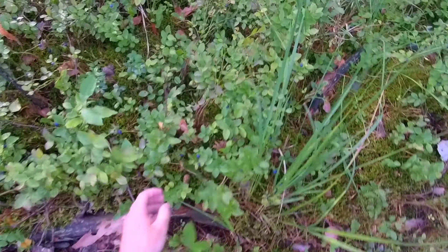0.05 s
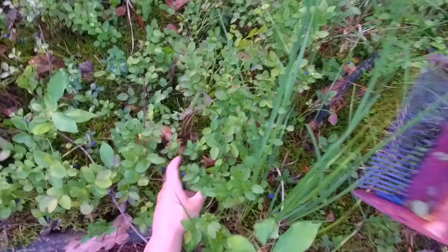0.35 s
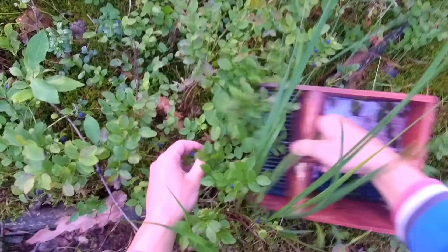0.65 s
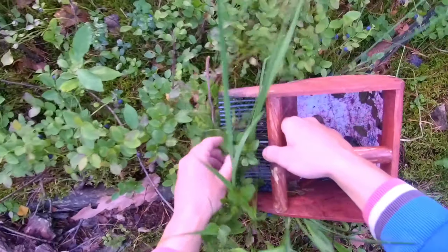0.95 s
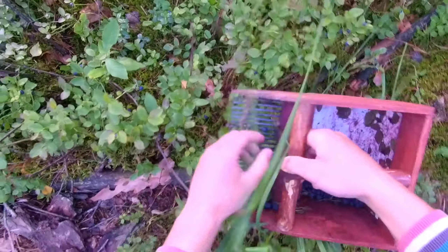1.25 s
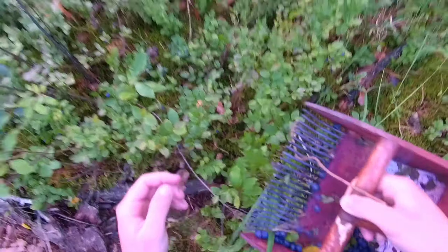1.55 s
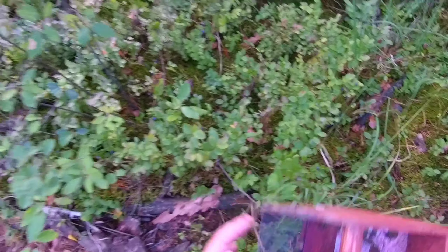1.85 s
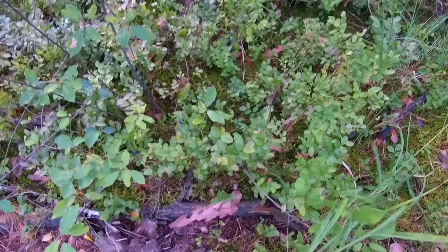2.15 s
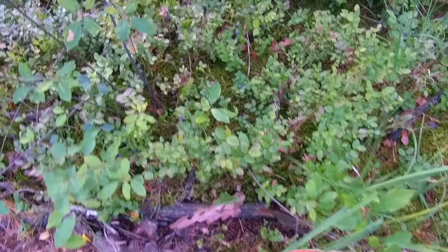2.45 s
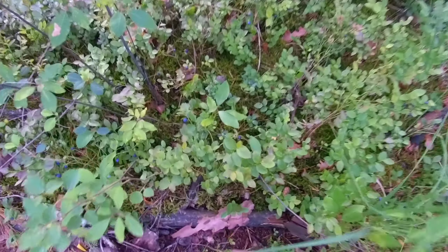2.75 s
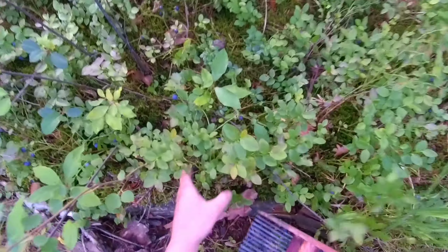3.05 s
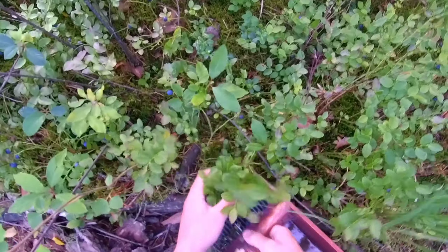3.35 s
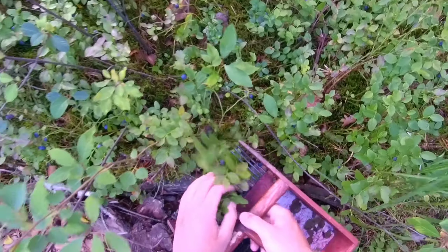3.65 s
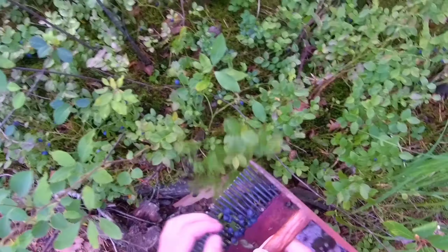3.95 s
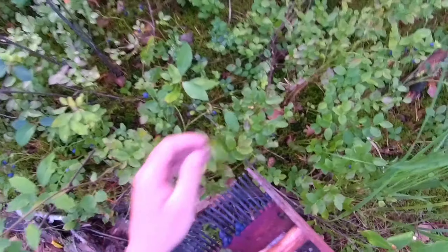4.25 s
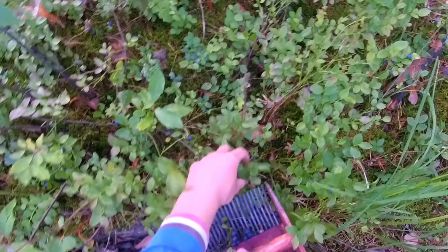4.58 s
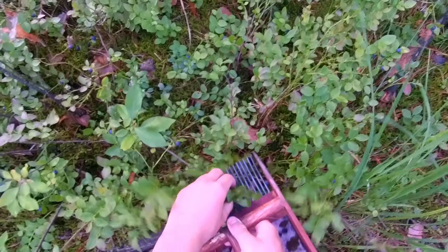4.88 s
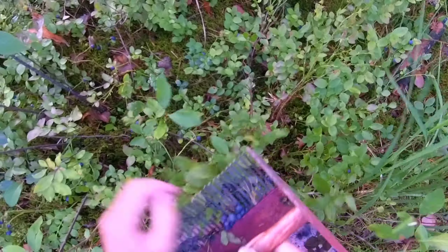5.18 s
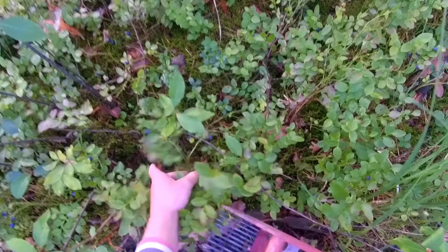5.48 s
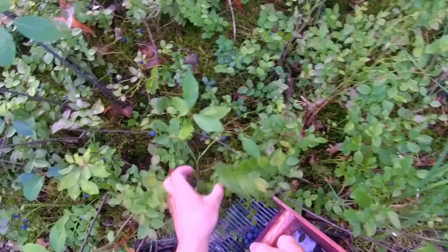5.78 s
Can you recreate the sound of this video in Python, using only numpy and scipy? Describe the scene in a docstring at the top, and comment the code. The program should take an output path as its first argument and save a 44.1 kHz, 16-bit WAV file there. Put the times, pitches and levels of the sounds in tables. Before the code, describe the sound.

A hand-held berry comb rakes through low bushes, close, dry and mostly on the left, over the faint air of an almost silent forest. From about 0.5 to 2 seconds, leaves crackle, stems scrape between the tines and stalks snap. The box knocks lightly, bumps the ground, and berries drop and roll inside it. From 2 to 3 seconds there is a lull with only faint twig scuffs. The raking then picks up, with sharp snaps and small pings of the tines just before 4 seconds. The hardest hollow knock of the box lands at about 4 seconds, followed by a quick cluster of knocks and plops between 4.2 and 4.6. Another rustling stroke passes around 5 seconds, and one more hard knock comes at 5.4. Berries roll and plop softly under the last light strokes until about 6 seconds.

```python
"""A berry comb rakes through low bushes, close on the left, in an almost silent forest.
In the first strokes leaves crackle, stems scrape between the tines and stalks snap, while the box
knocks and berries drop and roll in its hopper. From 2 to 3 s there is a lull of faint twig scuffs.
Then the raking picks up, with the hardest hollow knock near 4 s and a quick cluster after it.
One more hard knock comes at 5.4 s, and berries roll and plop under the last light strokes."""
import sys
import numpy as np
from scipy import signal
from scipy.io import wavfile
from scipy.ndimage import map_coordinates

SR = 44100
rng = np.random.default_rng(int(sys.argv[2]) if len(sys.argv) > 2 else 0)


def master(y):
    """Save y as 16-bit WAV."""
    cut = np.clip(np.atleast_2d(y).T, -1, 1)
    pcm = np.round(cut * 32767)  # scale
    wavfile.write(sys.argv[1], SR, pcm.astype(np.int16))


N = 265482
TIME = np.arange(N) / SR
RING = np.arange(round(.15 * SR)) / SR  # time axis of a one-shot [s]
HOLLOW_HZ = 510.5  # the note of the air in the hopper

# modes of the comb's tines: (frequency [Hz], level [dB], t60 [s])
TINE_MODES = [(1219, 9, 0.024), (1580, 0.5, 0.032), (1871, 13.5, 0.026), (2314, 0, 0.065),
              (2935, -7, 0.049)]
# woody spectrum of the stems: (frequency [Hz], level [dB])
STEM_SPECTRUM = [(100, -23.5), (250, -14.5), (600, 0.5), (900, -5.5), (1250, -6), (1900, -2.5), (2800, 0),
                 (3500, -7.5), (6000, -14), (12000, -45)]
# bright spectrum of a breaking stalk or leaf: (frequency [Hz], level [dB])
CRACK_SPECTRUM = [(500, -15), (2500, -12), (5000, 7), (8000, 11), (9800, 12.5), (12500, 4), (16000, 3.5)]


def amp(db):
    """Decibels to gain."""
    return 10 ** (np.asarray(db) / 20)


def unit_rms(x):
    """Scales to rms 1."""
    return x / np.sqrt(np.mean(x ** 2) + 1e-20)


def add(mix, start, sound):
    """Mixes in a stereo sound at start [s]."""
    part = mix[:, max(round(start * SR), 0):][:, :sound.shape[1]]
    part += sound[:, :part.shape[1]]


def pan(left_db):
    """Left and right gains of unit power."""
    gains = np.array([[amp(left_db)], [1]])
    return gains / np.linalg.norm(gains)


def through_box(x, right_db, lag_rad):
    """Sound carried by the box reaches the right side at another level and later in phase."""
    late = (signal.hilbert(x, 2 * len(x))[:len(x)] * np.exp(-1j * lag_rad)).real
    return np.array([x, amp(right_db) * late])


def colour(x, spectrum, size=2048):
    """Minimum-phase EQ of unit energy with the given spectrum."""
    hz, db = np.transpose(spectrum)
    bin_hz = abs(np.fft.fftfreq(size, 1 / SR)) + 1
    log_gain = np.log(amp(np.interp(np.log(bin_hz), np.log(hz), db)))
    taps = np.fft.ifft(np.exp(np.conj(signal.hilbert(log_gain)))).real[:size // 2]
    return signal.oaconvolve(x, taps / np.linalg.norm(taps))[:len(x)]


def mottle(x, depth_db, patch_s, patch_width, size=512):
    """Random brief patches of louder and softer bands make the colour flicker."""
    frames = dict(fs=SR, nperseg=size, noverlap=size * 3 // 4)
    hz, t, spectra = signal.stft(x, **frames)
    grid = np.meshgrid(np.sqrt(hz * 2000) / patch_width, t / patch_s, indexing="ij")
    patches = map_coordinates(rng.standard_normal((size // 4, size)), grid, order=2, mode="mirror")
    spectra = spectra * amp(depth_db * unit_rms(patches))
    return unit_rms(signal.istft(spectra, **frames)[1][:N])


def wander(per_s):
    """Random drift of rms 1."""
    return unit_rms(np.interp(TIME * per_s, np.arange(N), rng.standard_normal(N)))


def grains(per_s, spread_db):
    """Random clicks; a positive spread makes a few stand out, a negative one sinks a few."""
    size = amp(spread_db * np.minimum(rng.exponential(1, N), 5))
    return unit_rms(size * rng.choice([-1, 1], N) * (rng.random(N) < per_s / SR))


def burst(peak_s):
    """Transient envelope that reaches 1 at peak_s and dies away."""
    return RING / peak_s * np.exp(1 - RING / peak_s)


def ring(modes, rise_s, detune=0.0023):
    """A struck object; each blow wakes its modes a little differently."""
    out = 0
    for hz, db, t60 in modes:
        decay = amp(db + 2 * rng.standard_normal() - 60 * RING / t60)
        pitch = hz * (1 + detune * rng.standard_normal())
        out += decay * np.sin(2 * np.pi * (pitch * RING + rng.random()))
    out *= 1 - np.exp(-(RING / rise_s) ** 2)
    return out / abs(out).max()


def cavity(hz, rise_s, t60, tail_db, tail_t60):
    """Air in a box swells, dies fast and leaves a weaker after-ring."""
    attack = (1 - np.exp(-RING / rise_s)) ** 2
    shape = attack * (amp(-60 * RING / t60) + amp(tail_db - 60 * RING / tail_t60))
    return shape / shape.max() * np.sin(2 * np.pi * hz * RING)


def small_box(x, low_cut_hz=288):
    """The small box radiates little bass and dips on both sides of its hollow note."""
    # notches: (frequency [Hz], Q [ratio])
    dips = [(355, 2.97), (725, 19)]
    notches = [np.concatenate(signal.iirnotch(hz, q, fs=SR)) for hz, q in dips]
    low_cut = signal.butter(2, low_cut_hz, "highpass", fs=SR, output="sos")
    return signal.sosfilt(np.vstack([notches, low_cut]), x)


def forest(level_db=-69):
    """A faint, even bed of air."""
    # forest air: (frequency [Hz], level [dB])
    spectrum = [(20, 22), (100, 12.5), (250, 8), (800, 5), (2000, -2.5), (5000, 0), (15000, -10)]
    return amp(level_db) * np.array([colour(rng.standard_normal(N), spectrum) for _ in range(2)])


def twig_scuffs():
    """A twig sliding past the comb sticks and slips for a moment around its own pitch."""
    # sliding twigs: (time [s], level [dB], centre [Hz], length [s])
    scuffs = [(0.315, -53.5, 1015, 0.015), (1.724, -54, 2040, 0.03), (1.921, -55, 1520, 0.06),
              (2.172, -67.5, 1373, 0.066), (2.173, -64.5, 3170, 0.062), (2.242, -65, 3220, 0.055),
              (2.372, -55.5, 1238, 0.027), (2.375, -58, 2440, 0.035), (2.411, -52.5, 1530, 0.019),
              (2.504, -55, 1330, 0.014), (2.586, -52, 2710, 0.01), (2.83, -56.5, 2700, 0.072),
              (2.877, -50.5, 2700, 0.011), (3.068, -43.5, 2420, 0.012), (3.147, -47.5, 2750, 0.017),
              (4.917, -47.5, 2280, 0.014), (5.168, -52.5, 1260, 0.029)]
    # spectrum of a scuff: (frequency [multiple of the centre], level [dB])
    shape = [(.25, -21.5), (0.699, -6), (1, 4), (1.3, -12.5), (2.2, -22.5), (6.002, -40)]
    out = np.zeros((2, N))
    for start, db, hz, length in scuffs:
        u = RING / length
        slips = rng.standard_normal(len(RING)) * amp(9.56 * rng.standard_normal(len(RING)))
        swell = 4 * u * np.exp(-3 * u ** 2)
        scuff = colour(slips * swell, [(hz * ratio, level) for ratio, level in shape])
        add(out, start, through_box(amp(db) * scuff, right_db=-32, lag_rad=0.94))
    return out


def twig_ticks(stem_gain, level_db=-11.5, t60=0.037):
    """Small twigs flick off the tines at random, each with a brief pitch of its own."""
    out = np.zeros(N)
    for hz in np.geomspace(1400, 7000, 12):
        flicks = grains(per_s=3, spread_db=-5)
        out += signal.oaconvolve(flicks, ring([(hz, 0, t60)], rise_s=0.0013, detune=0.074))[:N]
    return amp(level_db) * unit_rms(out) * stem_gain


def tine_pings(rise_s=0.0016, t60=0.17):
    """A single tine, plucked by a stalk, rings on alone."""
    # plucks: (time [s], level [dB], pitch [Hz])
    plucks = [(1.925, -36.5, 1920), (2.061, -48.5, 1900), (3.763, -32.5, 1586), (3.866, -33.5, 1580),
              (3.868, -36, 1810), (5.181, -39.5, 1958)]
    out = np.zeros((2, N))
    shape = (1 - np.exp(-RING / rise_s)) * amp(-60 * RING / t60) * signal.windows.tukey(len(RING), .04)
    for start, db, hz in plucks:
        ping = amp(db) * shape * np.sin(2 * np.pi * hz * RING)
        add(out, start, through_box(ping, right_db=-46, lag_rad=1.5))
    return out


def ground_bumps():
    """The comb bumps the ground with a short, dull note."""
    # bumps: (time [s], peak [dB], pitch [Hz], left over right [dB])
    bumps = [(0.7592, -31, 880, -4.5), (0.76, -33, 337, 3), (0.76, -35.5, 201, -2),
             (0.765, -34.5, 116, -0.5), (3.473, -32, 265, 3.5), (3.767, -32.5, 291.6, 9)]
    out = np.zeros((2, N))
    for start, db, hz, left_db in bumps:
        thud = cavity(hz, rise_s=0.0038, t60=0.037, tail_db=-27.5, tail_t60=0.18)
        add(out, start, through_box(amp(db) * thud, right_db=-left_db, lag_rad=1))
    return out


def berry_roll(stem_gain, jostle_db=-11.5, rise_db_per_s=501, fall_db_per_s=122):
    """Berries patter as the hopper is shaken or tilted, each spot with its own hollow note."""
    # tilts of the hopper: (start [s], end [s], level [dB])
    tilts = [(0.0, 0.216, -57.5), (0.334, 0.75, -50), (0.562, 0.92, -42), (3.057, 3.273, -47),
             (3.468, 4.02, -44), (4.178, 4.498, -42), (4.695, 5.01, -44.5), (5.248, 5.607, -41),
             (5.776, 5.895, -41)]
    power = amp(jostle_db) ** 2 * (stem_gain ** 2).sum(0)
    for start, end, db in tilts:
        fade_db = rise_db_per_s * np.maximum(start - TIME, 0) + fall_db_per_s * np.maximum(TIME - end, 0)
        power += amp(db - fade_db) ** 2
    patter = np.zeros(N)
    for hz in np.linspace(440, 575, 7):
        tap = cavity(hz, rise_s=0.0078, t60=0.021, tail_db=-35, tail_t60=0.2)
        weight = np.exp(-((hz - HOLLOW_HZ) / 85) ** 2)
        patter += weight * signal.oaconvolve(grains(per_s=19, spread_db=1), tap)[:N]
    return through_box(unit_rms(patter) * np.sqrt(power), right_db=-29, lag_rad=0.96)


def berry_plops():
    """Shifting clumps softly sound the hopper's air; berries dropping in ring longer."""
    # shifting clumps: (time [s], level [dB])
    clumps = [(0.172, -35.5), (0.292, -34), (0.34, -25), (0.402, -25.5), (0.43, -31), (0.516, -21),
              (0.9, -28), (1.429, -32), (1.866, -24.5), (3.115, -33), (3.496, -20), (3.547, -28),
              (3.58, -26), (4.232, -23.5), (4.248, -22.5), (4.284, -15.5), (4.441, -23.5), (4.685, -28.5),
              (4.714, -25.5), (5.039, -27), (5.854, -26.5), (5.879, -28.5), (5.924, -24)]
    # dropping berries: (time [s], peak [dB], pitch [Hz])
    drops = [(.611, -30, 791), (1.046, -29, 797), (1.337, -30.5, 803), (2.576, -41.5, 464)]
    out = np.zeros((2, N))
    for start, db in clumps:
        hz = HOLLOW_HZ * (1 + 0.045 * rng.standard_normal())
        plop = cavity(hz, rise_s=0.011, t60=0.018, tail_db=-39, tail_t60=0.092)
        add(out, start, through_box(amp(db) * small_box(plop), right_db=-25, lag_rad=1.5))
    for start, db, hz in drops:
        drop = cavity(hz, rise_s=0.0047, t60=0.064, tail_db=-4, tail_t60=0.094)
        add(out, start, through_box(amp(db) * drop, right_db=-20, lag_rad=1))
    return out


def box_knocks(settle_db=-41, settle_s=0.022):
    """A blow on the handled box makes its walls clack and the air inside ring."""
    # blows: (time [s], level [dB], clack over hollow ring [dB], pitch [Hz], clack low-pass [Hz])
    blows = [(0.598, -25.5, -6, 516, 1200), (0.694, -21, -22, 430, 2200), (0.779, -20.5, -6, 493, 1300),
             (1.608, -34, -10.5, 518, 1200), (1.742, -24, -20, 490, 1500), (3.471, -23.5, -5, 575, 1830),
             (3.9822, -3, -9, 524.3, 1450), (4.099, -18, -9.5, 490, 1520), (4.268, -7, -4, 500, 2670),
             (4.323, -16.5, -6.5, 513, 1400), (4.3565, -10, -4, 530, 3000), (4.379, -16.5, -10, 505, 1040),
             (4.453, -20.5, -5.5, 506, 1700), (4.478, -15.5, -16, 515, 1100),
             (4.6285, -23.5, -19, 507, 1200), (5.3855, -8.5, -9.5, 503, 1900), (5.501, -21, -14, 519, 1000)]
    # modes of the walls: (frequency [Hz], level [dB], t60 [s])
    wall_modes = [(875, 1, 0.018), (1050, 4, 0.024), (1394, 3, 0.013), (1905, 0.5, 0.019),
                  (2390, 1.5, 0.012)]
    # toneless crack of a hard contact: (frequency [Hz], level [dB])
    wall_crack = [(800, -16), (2400, 4.5), (6000, -8.5), (14000, -30)]
    out = np.zeros((2, N))
    for start, db, clack_db, hz, top_hz in blows:
        hollow = cavity(hz, rise_s=0.0051, t60=0.021, tail_db=-38.5, tail_t60=0.075)
        # after the first touch the contact chatters briefly, then the load settles
        decay = 0.08 * np.exp(-RING / 0.0022) + amp(settle_db) * np.exp(-RING / settle_s)
        chatter = rng.standard_normal(len(RING)) * decay
        chatter[0] = 1
        clack = signal.fftconvolve(chatter, ring(wall_modes, rise_s=0.0006, detune=0.024))[:len(RING)]
        clack = signal.sosfilt(signal.butter(4, top_hz, fs=SR, output="sos"), clack)
        clack *= amp(clack_db) / abs(clack).max()
        crack = colour(rng.standard_normal(len(RING)) * burst(peak_s=0.0021), wall_crack)
        crack *= amp(-18.5 + 2 * clack_db)
        knock = amp(db) * small_box(hollow + clack + crack)
        # louder knocks sound less far to the left
        add(out, start, through_box(knock, right_db=-12 + 0.36 * db, lag_rad=1.62))
    return out


def leaf_tears():
    """A leaf comes off with one thin, bright tick and no woody ring."""
    # tearing leaves: (time [s], level [dB])
    tears = [(1.0963, -25.5), (1.534, -29.5), (1.569, -33), (1.672, -43), (1.726, -44), (1.766, -41.5),
             (1.892, -41), (3.7012, -26), (3.7726, -27), (3.959, -39), (4.47, -33)]
    out = np.zeros((2, N))
    for start, db in tears:
        tick = colour(rng.standard_normal(len(RING)) * burst(peak_s=0.00094), CRACK_SPECTRUM)
        add(out, start, amp(db) * tick * pan(left_db=30))
    return out


def stalk_snaps(fibre_db=-9.5, fibre_decay_s=0.01, fibres_per_s=420):
    """A sharp crack, then the last fibres break one by one; the freed stalk rings the tines."""
    # snaps: (time [s], wood level [dB], crack level [dB], pan to the left [dB])
    snaps = [(0.4726, -27, -34, 22), (0.5185, -30, -39, 33), (0.6964, -18, -30, 17), (0.744, -27, -35, 18),
             (0.7595, -15.5, -34, -3), (0.816, -18.5, -25, 1), (0.826, -16.5, -37, -3),
             (1.024, -17.5, -26.5, 19), (1.1452, -24, -29, 0), (1.2351, -19.5, -22, 23),
             (1.404, -25, -57, -1), (1.9078, -17.5, -46, 26), (2.933, -36, -41.5, 34),
             (2.987, -37.5, -40.5, 31), (3.227, -32.5, -25, 29), (3.763, -20.5, -18.5, 19.5),
             (3.809, -22.5, -28.5, 23), (3.8669, -18, -25.5, 20), (3.912, -34, -34, 18),
             (4.3402, -42, -55, 15), (4.444, -32.5, -31, 19)]
    out = np.zeros((2, N))
    for start, wood_db, crack_db, left_db in snaps:
        breaks = rng.random(len(RING)) < fibres_per_s / SR
        breaks = breaks * amp(fibre_db) ** 2 * np.exp(-RING / fibre_decay_s)
        breaks[0] = 1
        power = abs(signal.fftconvolve(breaks, burst(peak_s=0.00053) ** 2)[:len(RING)])
        wood_noise, crack_noise = rng.standard_normal((2, len(RING))) * np.sqrt(power)
        tines = ring(TINE_MODES, rise_s=0.000067)
        tines = signal.fftconvolve(wood_noise, tines / np.linalg.norm(tines))[:len(RING)]
        wood = amp(-4) * colour(wood_noise, STEM_SPECTRUM) + amp(-6) * tines
        snap = amp(wood_db) * wood + amp(crack_db) * colour(crack_noise, CRACK_SPECTRUM)
        add(out, start, through_box(snap, right_db=-1, lag_rad=1.78) * pan(left_db))
    return out


def leaf_rustle(gain, crackle_db=-8, crackle_power=0.85):
    """Dense tiny leaf clicks, and single leaves flipping with a fizz that stands out in light strokes."""
    # crisp leaves: (frequency [Hz], level [dB])
    spectrum = [(700, -37), (2000, -18), (4000, -1.5), (6500, 1.5), (8200, 0), (9700, 2), (11200, 0.5),
                (12500, -2), (16000, -5)]
    rustle = colour(grains(per_s=9000, spread_db=1), spectrum)
    rustle = mottle(rustle, depth_db=1.5, patch_s=.012, patch_width=150)
    flips = signal.oaconvolve(abs(grains(per_s=70, spread_db=2.6)), burst(peak_s=0.0013))[:N]
    crackle = colour(flips * rng.standard_normal(N), spectrum)
    crackle = mottle(crackle, depth_db=4.5, patch_s=.01, patch_width=500)
    crackle *= amp(crackle_db) * gain.max() * (gain / gain.max()) ** crackle_power
    return rustle * gain + crackle


def stem_scrape(depth, body_hz=1840, body_db=7, body_power=0.38):
    """Slipping stems set the tines singing; their woody body grows as the comb pushes deep."""
    slips = grains(per_s=1500, spread_db=2)
    stems = mottle(colour(slips, STEM_SPECTRUM), depth_db=2.4, patch_s=.018, patch_width=220)
    body = signal.sosfiltfilt(signal.butter(3, body_hz, fs=SR, output="sos"), stems)
    stems += (amp(body_db) * depth ** body_power - 1) * body
    tines = unit_rms(signal.oaconvolve(slips, ring(TINE_MODES, rise_s=0.0035))[:N])
    return stems + amp(-6.5) * tines


def stroke_gains():
    """Each stroke touches, tightens and lets go: stereo gains for leaves and stems, mono for the rub."""
    # strokes: (touch [s], full grip [s], let go [s], fade [dB/s],
    #           leaves [dB], stems [dB], box rub [dB], left over right [dB])
    strokes = [(0.0, 0.226, 0.24, 296, -56.5, -70, -68, 18), (0.499, 0.71, 0.76, 28, -41, -39.5, -52, 26),
               (0.925, 1.225, 1.196, 38, -36, -39, -43.5, 17),
               (1.675, 1.737, 1.79, 148.5, -55.5, -52.5, -63.5, 40.5),
               (1.84, 1.92, 1.904, 61, -50, -51.5, -69.5, 40), (2.371, 2.44, 2.58, 73, -59, -61, -81, 36),
               (2.83, 2.95, 2.94, 96, -65, -55, -100, 27), (3.024, 3.22, 3.383, 138, -46.5, -44, -92, 35),
               (3.376, 3.41, 3.54, 240, -42, -47.5, -55, 31), (3.583, 3.71, 3.9, 418, -40, -45.5, -46, 34),
               (3.936, 3.945, 3.97, 62, -58, -58, -61.5, 22),
               (4.28, 4.49, 4.6, 98, -56, -54.5, -72.5, 10.5),
               (4.538, 4.634, 4.68, 42, -48, -51.5, -70, 32),
               (4.825, 4.967, 5.04, 110, -42, -44, -53.5, 34),
               (5.015, 5.021, 5.09, 266, -39, -41, -53.5, 40), (5.376, 5.437, 5.72, 95, -49, -50, -73, 28),
               (5.917, 5.984, 5.99, 51, -45.5, -48, -62, 30)]
    touch_db, attack_db_per_s = -5.5, 191
    stem_slope, rub_slope = 1.13, 1.6  # stems and box answer the grip more steeply than leaves
    rub_lag_s = 0.033  # the box follows the tines through the undergrowth
    rest = pan(left_db=22)  # the bush stirs faintly against the resting comb
    leaf_power, stem_power, rub_power = (amp(-71) * rest) ** 2, (amp(-75) * rest) ** 2, 0
    for touch, full, let_go, fade, leaf_db, stem_db, rub_db, left_db in strokes:
        slack = np.clip((full - TIME) / max(full - touch, .005), 0, 1)
        attack_db = attack_db_per_s * np.maximum(touch - TIME, 0)
        release_db = fade * np.maximum(TIME - let_go, 0)
        grip_db = np.maximum(touch_db * slack - attack_db - release_db, -100)
        leaf_power = leaf_power + (pan(left_db) * amp(leaf_db + grip_db)) ** 2
        stem_power = stem_power + (pan(left_db) * amp(stem_db + stem_slope * grip_db)) ** 2
        rub_power += amp(rub_db + rub_slope * np.interp(TIME - rub_lag_s, TIME, grip_db)) ** 2
    return np.sqrt(leaf_power), np.sqrt(stem_power), np.sqrt(rub_power)


def raking(leaf_gain, stem_gain, rub_gain):
    """Leaves and stems pass the tines in clumps, over the low rub of the box."""
    # box rubbing through the undergrowth: (frequency [Hz], level [dB])
    rub_spectrum = [(30, -21), (100, -11.5), (200, 2), (310, 11.5), (400, -5), (600, -11), (1200, -22.5),
                    (3000, -55)]
    clumps = amp(wander(per_s=90) + 0.5 * wander(per_s=22.33))
    depth = np.clip(rub_gain / np.linalg.norm(stem_gain, axis=0), .01, 1)
    bush = [leaf_rustle(leaf) + stem * stem_scrape(depth) for leaf, stem in zip(leaf_gain, stem_gain)]
    rub = colour(grains(per_s=1100, spread_db=4.5), rub_spectrum) * rub_gain
    return np.array(bush) * clumps + through_box(rub, right_db=-9, lag_rad=1)


def scene():
    """Everything sounds close and dry in the open air."""
    leaf_gain, stem_gain, rub_gain = stroke_gains()
    bush = raking(leaf_gain, stem_gain, rub_gain) + twig_ticks(stem_gain)
    box = berry_roll(stem_gain) + box_knocks() + berry_plops() + ground_bumps()
    accents = stalk_snaps() + leaf_tears() + twig_scuffs() + tine_pings()
    return bush + box + accents + forest()


def record(dry):
    """A gentle bass roll-off and a steep cut of the highest treble."""
    low_cut_hz, high_cut_hz = 100, 16200
    lean = signal.sosfilt(signal.butter(1, low_cut_hz, "highpass", fs=SR, output="sos"), dry)
    high_cut = signal.firwin(255, high_cut_hz, window=("kaiser", 9), fs=SR)
    return signal.oaconvolve(lean, high_cut[None], "same")


dry = scene()
out = record(dry)
master(out)
```